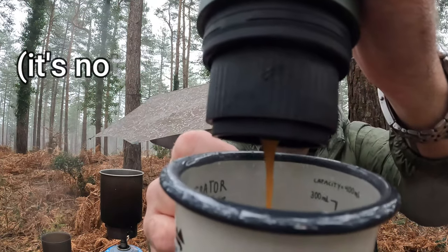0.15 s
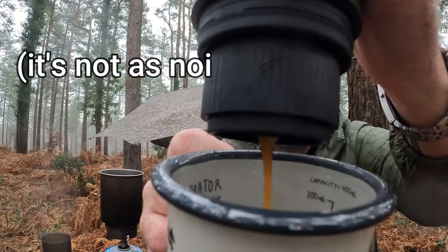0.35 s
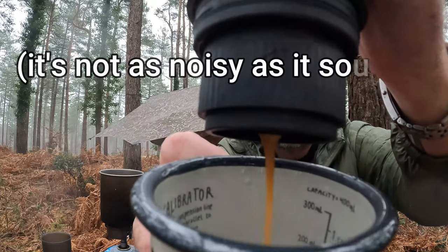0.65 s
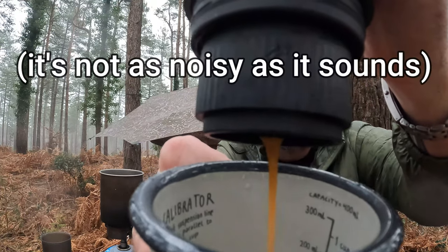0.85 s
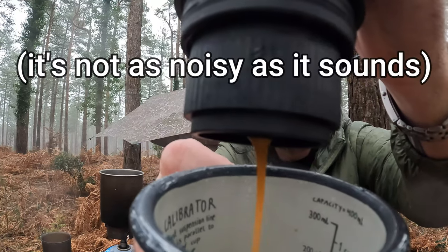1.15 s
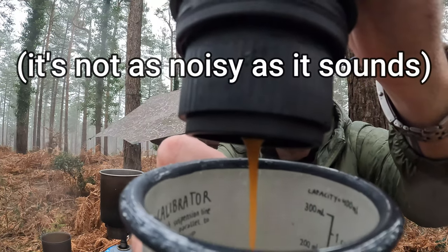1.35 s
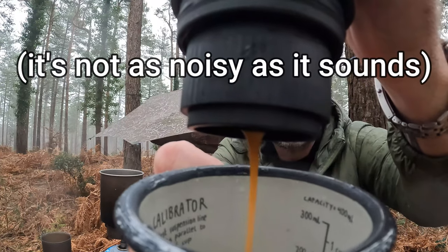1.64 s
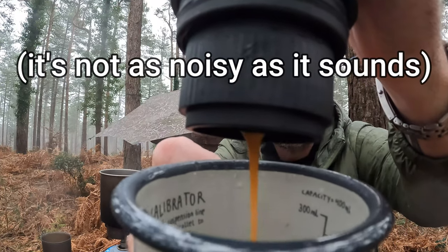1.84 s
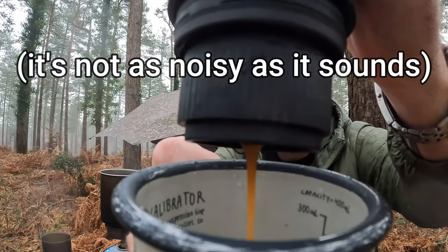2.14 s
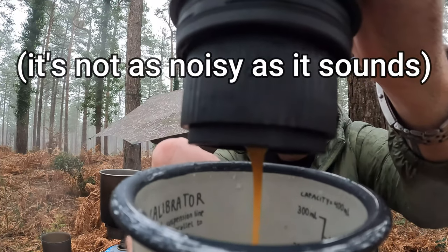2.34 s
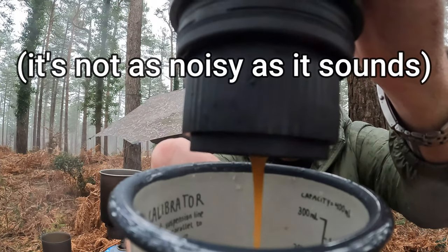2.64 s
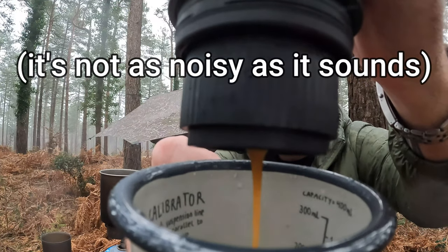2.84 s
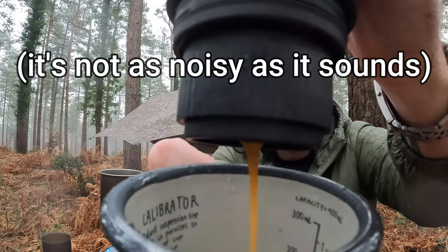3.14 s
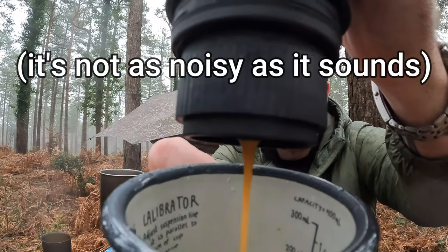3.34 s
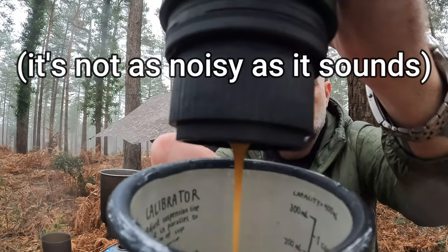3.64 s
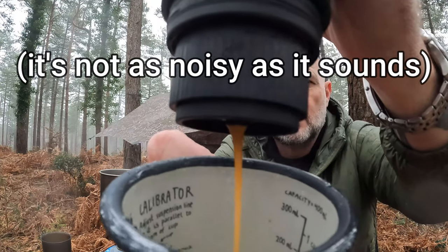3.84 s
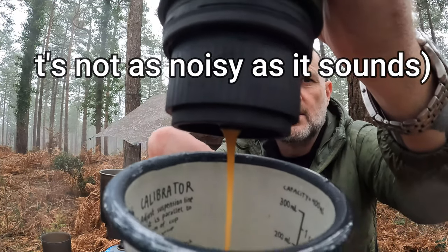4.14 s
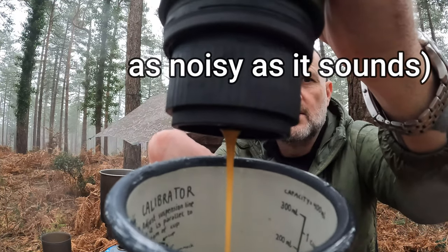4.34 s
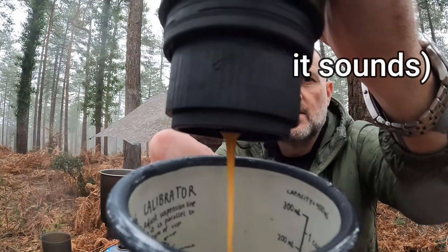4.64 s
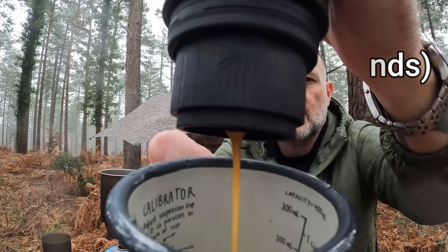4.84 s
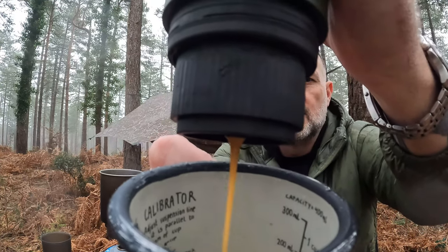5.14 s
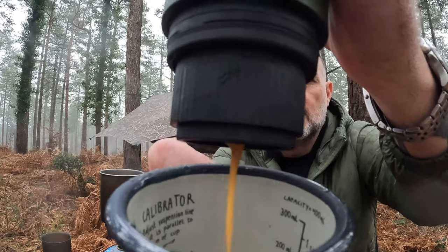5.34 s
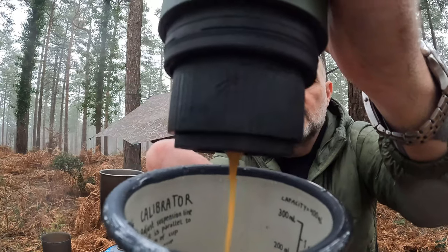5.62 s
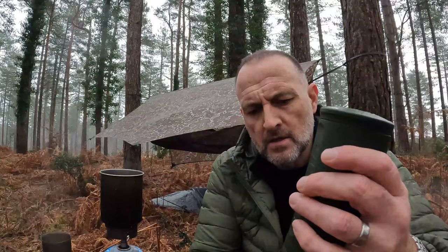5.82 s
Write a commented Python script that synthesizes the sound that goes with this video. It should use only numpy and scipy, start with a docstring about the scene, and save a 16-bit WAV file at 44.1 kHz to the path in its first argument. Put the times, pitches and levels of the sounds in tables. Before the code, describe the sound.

Already running at the start, a battery coffee pump drones at a fixed low pitch, coarse and buzzy, its plastic case rattling with each rapid stroke. One small case click comes early on. Just before the end the pump cuts off; the motor whirrs down with a click and tiny valve ticks. Close, centred, dry microphone in open air; a low distant rumble hides beneath.

```python
"""In a wood, a hand-held electric espresso maker pumps a shot close to the microphone.
Its piston strikes four blows a cycle, about 69 cycles a second; each blow excites resonances of the plastic case.
Shaped noise makes the motor's whirr and the hiss of water; tones locked to the stroke make the gear whine.
The pump cuts out near the end and the motor runs on briefly with a few light ticks; the case clicks
once during pumping and once after the stop. Far behind lie a noise rumble and a wavering sine drone,
as of distant traffic, over a faint, even recorder hiss."""
import sys
import numpy as np
from scipy import signal
from scipy.fft import rfft, irfft
from scipy.io import wavfile

SR = 44100
rng = np.random.default_rng(int(sys.argv[2]) if len(sys.argv) > 2 else 0)


def to_wav(s):
    """Save 16-bit WAV."""
    ch = np.atleast_2d(s).T  # columns
    pcm = np.round(np.clip(ch, -1, 1) * 32767)  # PCM
    wavfile.write(sys.argv[1], SR, pcm.astype(np.int16))


N = 263718
T = np.arange(N) / SR  # time [s]

# In all spectra the levels are relative: the noise is brought to rms 1 before its own level is set.
# piston speed: (time [s], rate [strokes/s])
PISTON_SPEED = [(0.0, 69.07), (0.3, 68.57), (0.4, 69.328), (0.5, 68.542), (0.7, 69.569), (1.1, 68.944),
                (2.0, 68.981), (2.1, 68.598), (2.2, 69.05), (2.4, 68.884), (2.9, 69.454), (3.3, 68.929),
                (3.4, 69.234), (4.0, 68.944), (4.17, 69.143), (5.01, 68.833), (5.85, 68.864)]
# the blows of one cycle, by name: (delay [ms], timing scatter [ms], level scatter [dB],
# scale of the gear's throb [dB], grit at high modes [0-1])
PISTON_BLOWS = {"valve": (0.252, 0.027, 1.08, 0.73, 0.34), "push": (0.666, 0.036, 0.33, 0.27, 0.46),
                "return": (5.4, 0.021, 0.36, .2, 0.35), "refill": (7.12, 0.0078, 1.35, 1.2, 0.68)}
# case modes rung by each blow, by its name: (frequency [Hz], width [Hz],
# relative level when full [dB], relative level when drained [dB])
CASE_MODES = { "valve": [(6020, 233, -44, -53), (6362, 680, -39, -42), (7150, 400, -52, -51.5),
              (8000, 450, -52, -55), (9490, 530, -58.5, -61.5), (10350, 630, -65.5, -74),
              (12100, 830, -66.5, -70), (14300, 1500, -68.5, -75)], "push": [(1054.5, 53, -29.5, -37.5),
              (1220.4, 227, -31, -32), (1374, 197, -34, -34.5), (1852, 192, -29.5, -41),
              (2670, 380, -44.5, -50.5), (3374, 340, -46, -49.5), (4050, 440, -48, -54.5),
              (4870, 380, -40.5, -41.5)], "return": [(541.2, 35.6, -34.5, -37.5), (745, 112, -32, -34.5),
              (814, 120, -26, -30.5), (955.8, 14, -36.5, -27), (1318, 217, -41, -39), (1938, 347, -40, -39),
              (2110, 40, -42.5, -35.5), (4863, 226, -45, -45)], "refill": [(2863, 117, -45, -43.5),
              (3720, 1840, -60.5, -54), (5720, 120, -52.5, -61), (6510, 1180, -49.5, -47),
              (7480, 1150, -57.5, -56.5), (11900, 4700, -74, -72)]}
# spectrum of the motor and gear whirr: (frequency [Hz], density [dB per Hz])
WHIRR_SPECTRUM = [(350, -10), (550, -7), (750, -1), (950, 5.5), (1350, 1), (1600, 1), (1950, -4),
                  (2350, -5.5), (2850, -10.5), (3300, -12), (6500, -22.5), (9000, -24), (15500, -52)]
# tones of the motor running free: (frequency [Hz], width [Hz], level before the fade [dB])
COAST_TONES = [(331, 350, -30), (1040, 350, -23), (1580, 120, -33), (1884, 100, -31), (2080, 180, -31),
               (2830, 190, -33)]
# first gear stage, before its trim: (time [s], level [dB])
WHINE_CURVE = [(0, -45), (.8, -41), (1.5, -53), (2.9, -36.5), (4.4, -48), (5.85, -52)]
# spectrum of water forced through the valves: (frequency [Hz], density [dB per Hz])
HISS_SPECTRUM = [(1500, -20), (3600, -2.5), (4400, 4.5), (4900, -41), (5400, 5), (6500, -30), (7200, 0.5),
                 (10000, -8), (15500, -16)]
# last ticks of the valve: (time [s], level [dB])
VALVE_TICKS = [(5.9103, -22), (5.9465, -34), (5.9785, -32)]
# clicks of the plastic case in the hand: (time [s], frequency [Hz], width [Hz], level [dB])
CASE_CLICKS = [(1.6635, 2960, 260, -18), (5.871, 2930, 130, -25)]
# spectrum of the far rumble: (frequency [Hz], density [dB per Hz])
RUMBLE_SPECTRUM = [(20, -42), (35, -26), (48, -8), (65, -1.5), (90, 0), (125, -2.5), (165, -6.5),
                   (260, -3.5), (330, -8), (420, -14), (700, -13), (2000, -58)]
# far drone, before its trim and flutter: (time [s], level [dB])
DRONE_CURVE = [(0.0, -43), (0.03, -37), (2.81, -35), (2.91, -30), (3.13, -57), (3.4, -29), (3.58, -42),
               (3.8, -31), (4.36, -47), (4.51, -29), (5.71, -45), (5.83, -33), (5.98, -45)]
# spectrum of the noise that differs between the two sides: (frequency [Hz], density [dB per Hz])
SIDE_SPECTRUM = [(20, 2), (70, 21), (250, 16), (600, 8), (1200, -14.5), (2200, 1), (5000, -4), (6500, 33.5),
                 (9000, -5), (15500, 2)]

FIRST_STROKE_S, STOP_S = .00839, 5.859
STROKES_PER_GEAR_TURN = 3.94
FIRST_MESHES_PER_STROKE, SECOND_MESHES_PER_STROKE = 40, 50
HALF_DRAINED_S, DRAINING_S = 4.06, 0.51  # middle and time scale of the S-curve of draining
EFFORT_DB, EFFORT_RISE_DB = -0.3, 2  # pump level when full, and its rise when drained
WHIRR_DB, WHIRR_EARLY_DB, WHIRR_SETTLE_S = -25.5, 1.3, 1  # steady level, first excess, settling time
WHIRR_FREE_DB = 0.5  # jump once the load is gone
CASE_SURGE_DB, CASE_SURGE_AT = 7.5, 0.17  # half the surge's full swing; place of its peak [cycles]
DRONE_HZ, DRONE_SAG_HZ_PER_S = 62.5, 0.461
EDGE_HZ = 15900  # upper limit of the recorder


def pump(grit_hz=5500, lowest_hz=470, sway_ms=0.027, hum_db=-44):
    """Piston and valves strike the case each cycle; the gear's turn throbs through their strength."""
    drained = drained_share()
    cycles = strokes_done()
    mean_speed = curve(PISTON_SPEED).mean()
    stroke = np.arange(int(np.interp(STOP_S, T, cycles)) + 1)
    starts = np.interp(stroke, cycles, T + sway_ms * wander(10) / 1000)
    gear = 2 * np.pi * stroke / STROKES_PER_GEAR_TURN
    throb = np.cos(gear) + 1.8 * np.sin(2 * gear)

    case = np.zeros(N)
    for name, (delay_ms, late_ms, scatter_db, throb_db, grit) in PISTON_BLOWS.items():
        late, strong = rng.standard_normal((len(stroke), 2)).T
        times = starts + (delay_ms + late_ms * late) / 1000
        strengths = amp(scatter_db * strong + throb_db * throb)
        blows = impulses(times, strengths * SR / mean_speed)
        gritty = chatter(blows, seconds=0.0014)
        for hz, width, full_db, drained_db in CASE_MODES[name]:
            # low modes ring clean, high ones rasp
            share = np.clip(grit * min(hz / grit_hz, 1) ** 3, 0, 1)
            drive = np.sqrt(1 - share ** 2) * blows + share * gritty
            level_db = full_db + (drained_db - full_db) * drained
            case += amp(level_db) * ring(drive, hz, width)

    # so small a case radiates little bass, apart from a faint hum at three times the stroke rate
    hz = np.fft.rfftfreq(N, 1 / SR)
    low_cut = 1 - np.exp(-(hz / lowest_hz) ** 4)
    case = irfft(rfft(case) * low_cut, N)
    hum = amp(hum_db) * evened(np.sin(2 * np.pi * 3 * cycles)) * (T < STOP_S)
    return (case + hum) * amp(EFFORT_DB + EFFORT_RISE_DB * drained)


def motor(case_hz=1870, case_width=170, case_db=-29, drained_db=-9, load_swing_db=1.95, hardest=0.67):
    """Gear noise swells once a stroke under the load; free-running tones die away after the stop."""
    cycles = strokes_done()
    load_db = load_swing_db * np.cos(2 * np.pi * (cycles - hardest)) * (T < STOP_S)
    settling_db = WHIRR_EARLY_DB * np.exp(-T / WHIRR_SETTLE_S)
    whirr_db = WHIRR_DB + settling_db + WHIRR_FREE_DB * (T > STOP_S)
    whirr = noise(WHIRR_SPECTRUM) * amp(whirr_db + load_db)

    # each stroke also scrapes a case resonance into life, less so as the water drains
    surge_db = CASE_SURGE_DB * (np.cos(2 * np.pi * (cycles - CASE_SURGE_AT)) - 1)
    scrape = amp(surge_db) * (T < STOP_S) * rng.standard_normal(N)
    case = evened(ring(scrape, case_hz, case_width)) * amp(case_db + drained_db * drained_share())

    free = (T > STOP_S) * np.exp(-np.maximum(T - STOP_S, 0) / 0.23)
    coast = np.zeros(N)
    for hz, width, db in COAST_TONES:
        coast += amp(db) * evened(ring(rng.standard_normal(N), hz, width))
    return whirr + case + free * coast


def gear_whine(trim_db=-3, second_db=-49, load_swing=.9, unsteady_turns=0.035):
    """Two gear stages sing at their mesh rates, the first loudest a quarter into each cycle."""
    cycles = strokes_done()
    slip = unsteady_turns * wander(32)
    load = 1 + load_swing * np.cos(2 * np.pi * (cycles - .25))
    first = evened(np.sin(2 * np.pi * (FIRST_MESHES_PER_STROKE * cycles + slip)) * load)
    second = evened(np.sin(2 * np.pi * (SECOND_MESHES_PER_STROKE * cycles + slip)))
    both = amp(curve(WHINE_CURVE) + trim_db) * first + amp(second_db) * second
    return both * (T < STOP_S)


def water(hiss_db=-40, fade_s=0.035):
    """Water forced through the valves hisses, dying when the pump stops."""
    fade = np.exp(-np.maximum(T - STOP_S, 0) / fade_s)
    return amp(hiss_db) * noise(HISS_SPECTRUM) * fade


def ticks(tick_hz=6800, tick_width=900, grit=1.5, dull_hz=6000):
    """The valve settles with a few light ticks, each a short ring and a dulled rasp."""
    times, db = np.transpose(VALVE_TICKS)
    blows = impulses(times, amp(db))
    keep = np.exp(-2 * np.pi * dull_hz / SR)
    rasp = signal.lfilter([1 - keep], [1, -keep], chatter(blows, seconds=.0008))
    return ring(blows, tick_hz, tick_width) * SR / (2 * tick_width) + grit * rasp


def handling(rasp_hz=3400, rasp_width=1500, rasp_db=10):
    """The case clicks in the hand: a short rasp and a moment of ringing."""
    out = np.zeros(N)
    for s, hz, width, db in CASE_CLICKS:
        click = impulses(np.array([s]), amp([db]))
        out += ring(click, hz, width) * SR / (2 * width)
        out += amp(rasp_db) * ring(chatter(click, seconds=.004), rasp_hz, rasp_width)
    return out


def far_off(rumble_db=-30.5, drone_trim_db=-1.0, waver_hz=1.9, flutter_db=0.5):
    """Noise rumble and a wavering, slowly sagging sine drone, as of distant traffic."""
    pitch_hz = DRONE_HZ - DRONE_SAG_HZ_PER_S * T + waver_hz * wander(4.4)
    tone = evened(np.sin(2 * np.pi * np.cumsum(pitch_hz) / SR))
    drone_db = curve(DRONE_CURVE) + drone_trim_db + flutter_db * wander(4)
    return amp(rumble_db) * noise(RUMBLE_SPECTRUM) + amp(drone_db) * tone


def recorder_hiss(floor_db=-54):
    """Faint, even white hiss under everything."""
    return amp(floor_db) * rng.standard_normal(N)


def strokes_done():
    """Running count of piston cycles, the integral of the speed."""
    speed = curve(PISTON_SPEED)
    return np.cumsum(speed) / SR - FIRST_STROKE_S * speed[0]


def drained_share():
    """How far the water has run out of the case, along one S-curve: 0 full, 1 drained."""
    return 1 / (1 + np.exp((HALF_DRAINED_S - T) / DRAINING_S))


def ring(x, hz, width):
    """A resonance applied twice, gain 1 at its centre: it swells, then dies."""
    t, damping = T[:SR // 10], np.pi * width
    swell = 2 * damping ** 2 * t * np.exp(-damping * t)
    response = swell * np.sin(2 * np.pi * hz * t) / SR
    return signal.oaconvolve(x, response)[:N]


def impulses(times, sizes):
    """One band-limited click at each exact time, placed between samples by a windowed sinc."""
    at = times[:, None] * SR
    near = np.floor(at).astype(int) + np.arange(-7, 9)
    clicks = sizes[:, None] * np.sinc(near - at) * np.sinc((near - at) / 8)
    out = np.zeros(N)
    np.add.at(out, np.clip(near, 0, N - 1), clicks)
    return out


def chatter(blows, seconds):
    """Each blow drags a short, decaying burst of noise of the same energy behind it."""
    keep = np.exp(-1 / (seconds * SR))
    energy = signal.lfilter([1 - keep], [1, -keep], blows ** 2 + 1e-20)
    return np.sqrt(energy) * rng.standard_normal(N)


def noise(points):
    """Noise of rms 1 with the spectrum given as (frequency [Hz], density [dB per Hz])."""
    hz, db = np.transpose(points)
    bins = np.fft.rfftfreq(N, 1 / SR)
    gain = amp(np.interp(np.log(bins + 1), np.log(hz), db))
    return evened(irfft(rfft(rng.standard_normal(N)) * gain, N))


def wander(rate_hz):
    """Slow random drift of rms 1: noise kept to about the given rate and below."""
    low_pass = np.exp(-(np.fft.rfftfreq(N, 1 / SR) / rate_hz) ** 2)
    return evened(irfft(rfft(rng.standard_normal(N)) * low_pass, N))


def curve(rows):
    """Joins (time [s], value) rows by straight lines."""
    return np.interp(T, *np.transpose(rows))


def evened(x):
    """Scales to rms 1."""
    return x / np.sqrt(np.mean(x ** 2) + 1e-20)


def amp(db):
    """Decibels to gain."""
    return 10 ** (np.asarray(db) / 20)


def scene(side_db=-50):
    """All sources sit in the middle; only a trace of noise differs between the sides."""
    machine = pump() + motor() + gear_whine() + water() + ticks()
    middle = machine + handling() + far_off() + recorder_hiss()
    side = amp(side_db) * noise(SIDE_SPECTRUM)
    return np.array([middle + side, middle - side])


def record(dry, ceiling=0.85):
    """The recorder rounds off the tallest peaks, then limits the band."""
    rounded = dry / (1 + (dry / ceiling) ** 6) ** (1 / 6)
    band = signal.firwin(511, EDGE_HZ, window=("kaiser", 9), fs=SR)
    return signal.oaconvolve(rounded, band[None], "same", axes=1)


dry = scene()
out = record(dry)
to_wav(out)
```